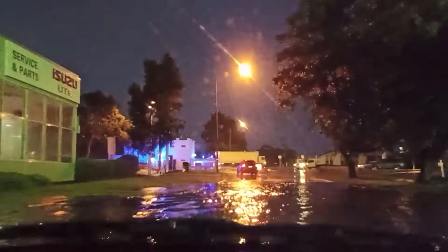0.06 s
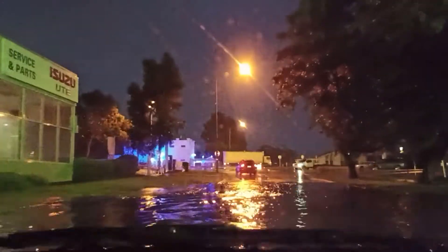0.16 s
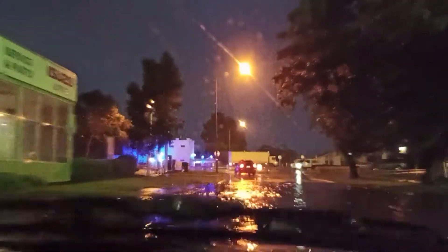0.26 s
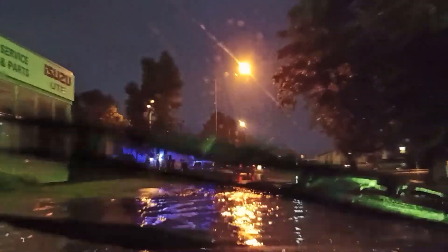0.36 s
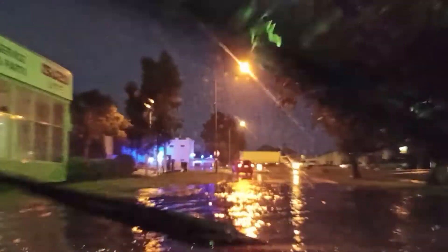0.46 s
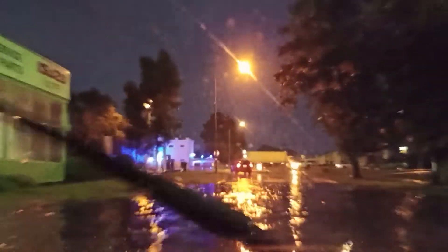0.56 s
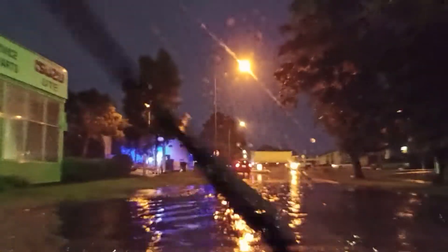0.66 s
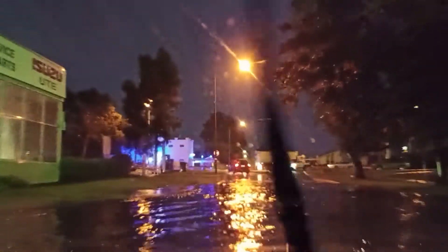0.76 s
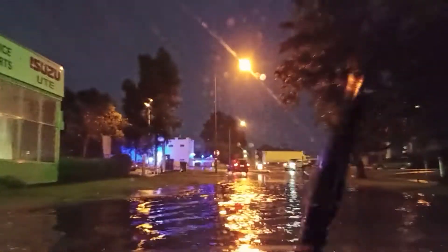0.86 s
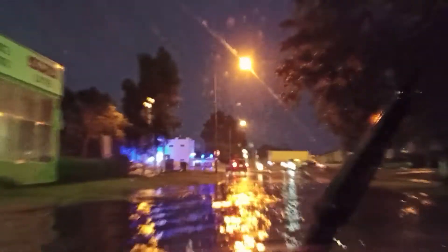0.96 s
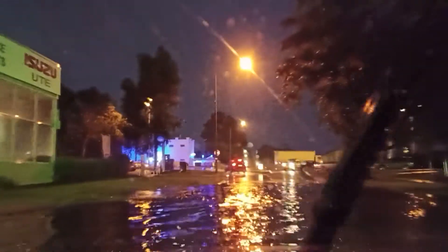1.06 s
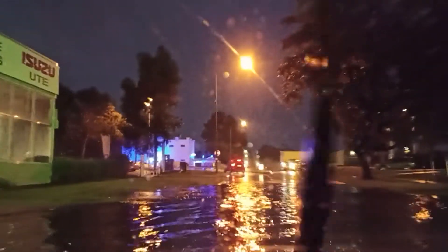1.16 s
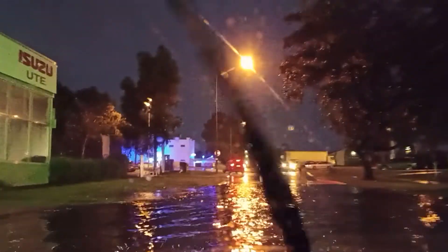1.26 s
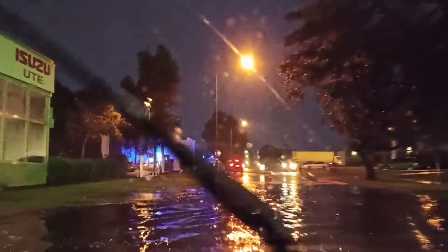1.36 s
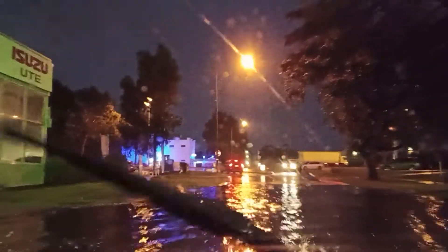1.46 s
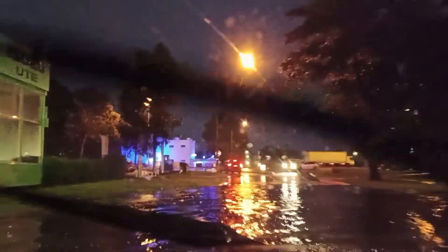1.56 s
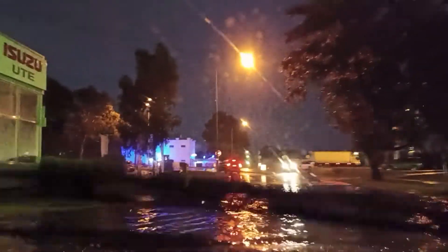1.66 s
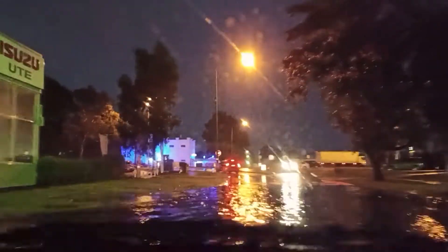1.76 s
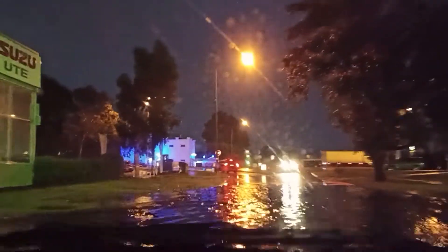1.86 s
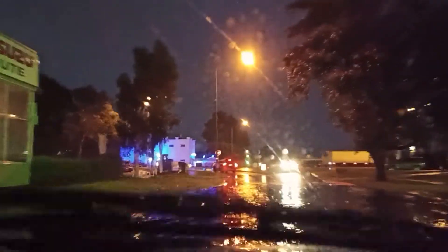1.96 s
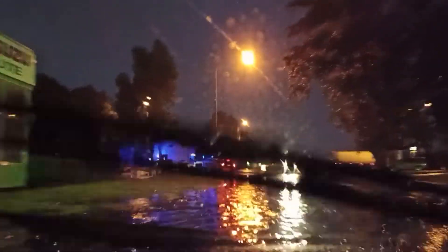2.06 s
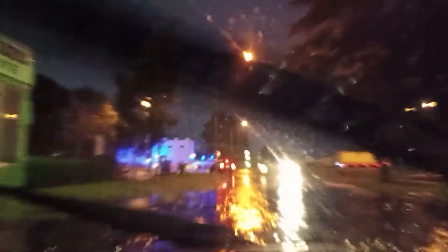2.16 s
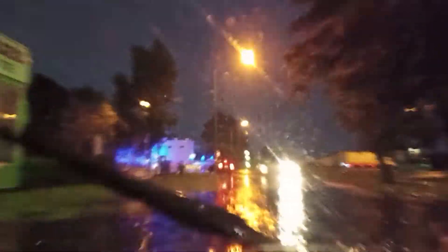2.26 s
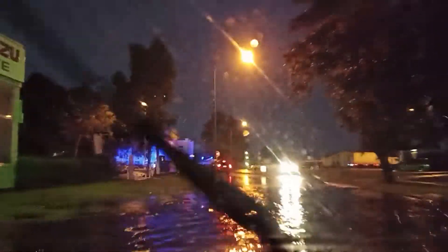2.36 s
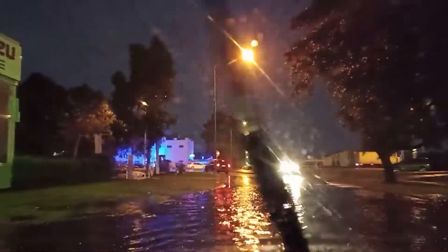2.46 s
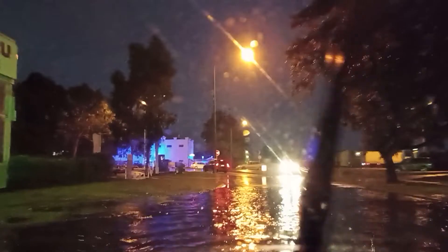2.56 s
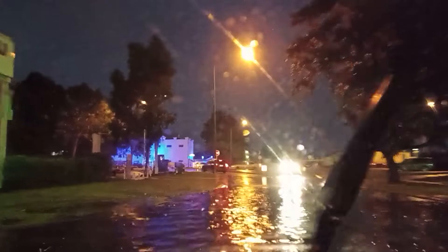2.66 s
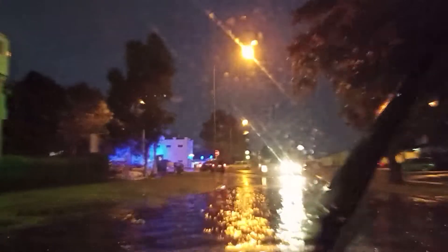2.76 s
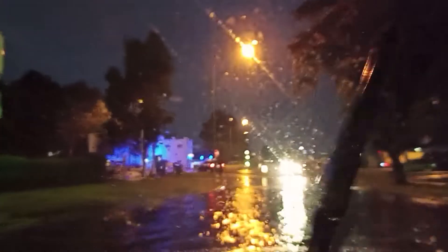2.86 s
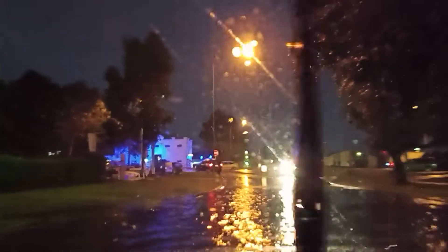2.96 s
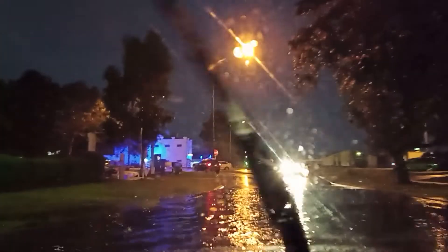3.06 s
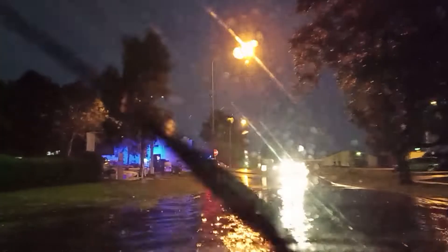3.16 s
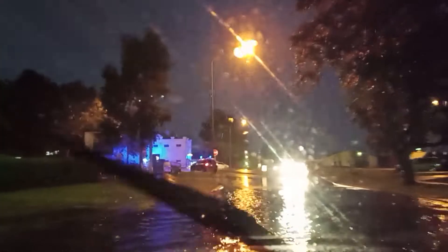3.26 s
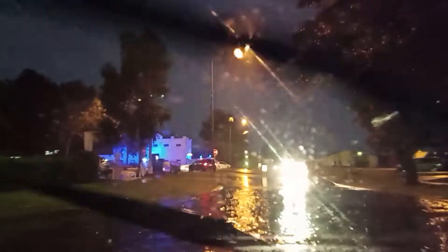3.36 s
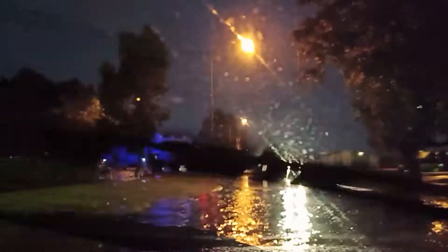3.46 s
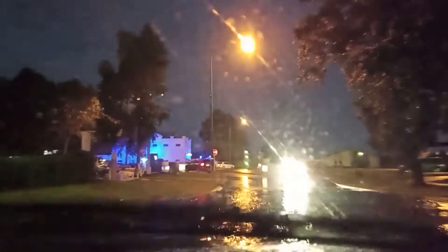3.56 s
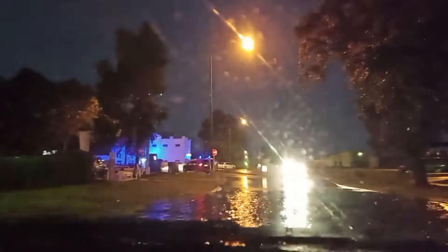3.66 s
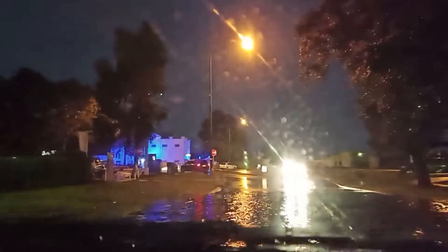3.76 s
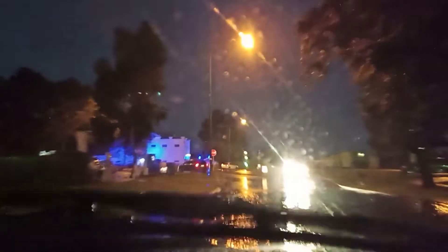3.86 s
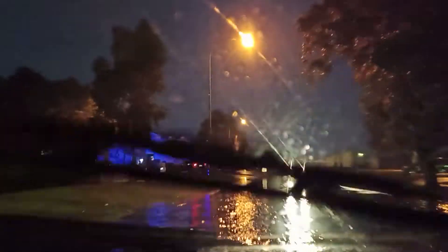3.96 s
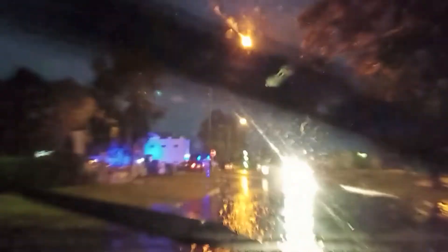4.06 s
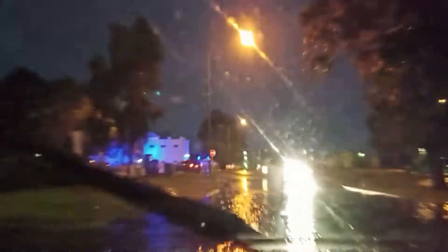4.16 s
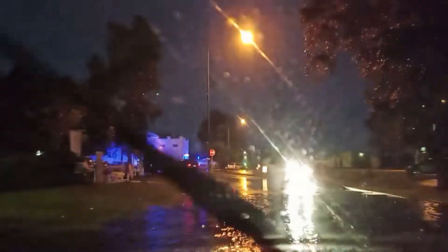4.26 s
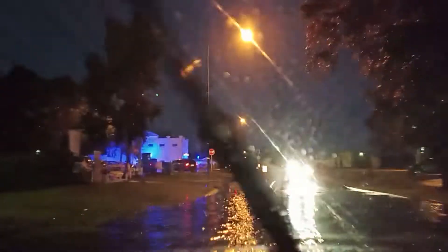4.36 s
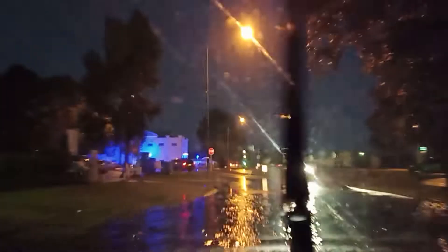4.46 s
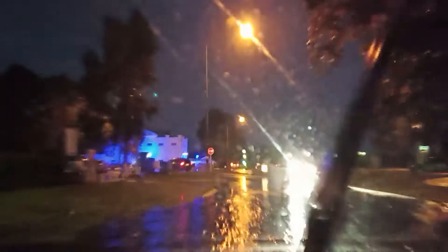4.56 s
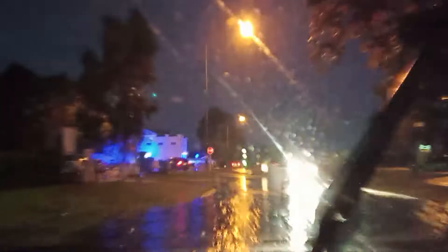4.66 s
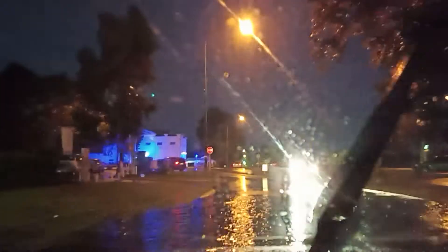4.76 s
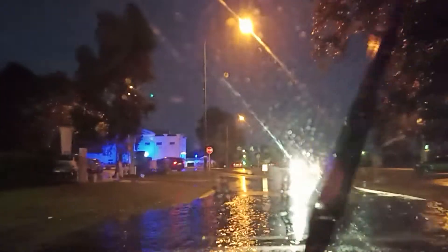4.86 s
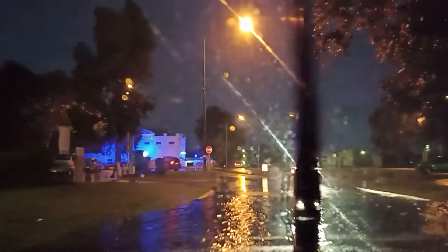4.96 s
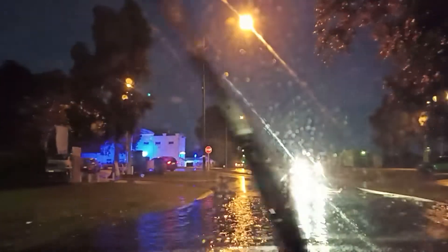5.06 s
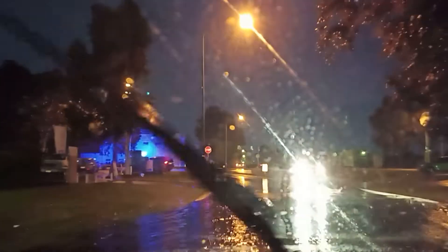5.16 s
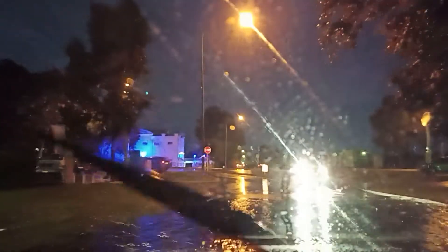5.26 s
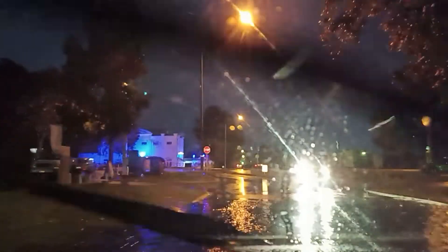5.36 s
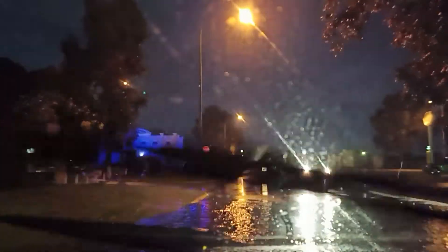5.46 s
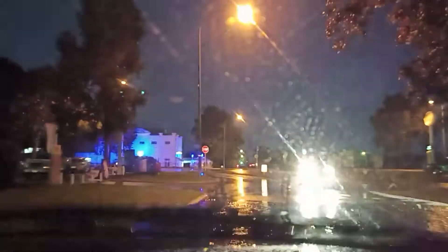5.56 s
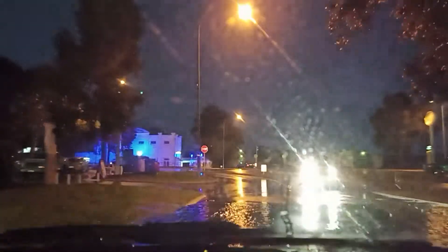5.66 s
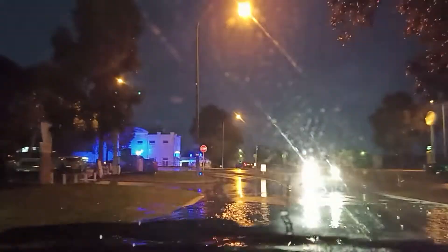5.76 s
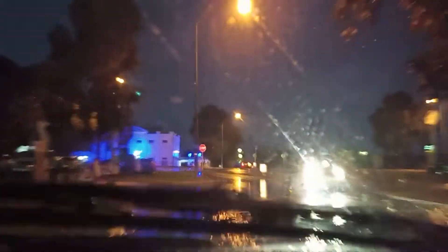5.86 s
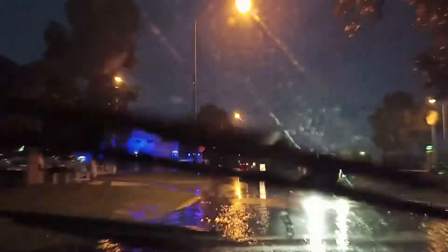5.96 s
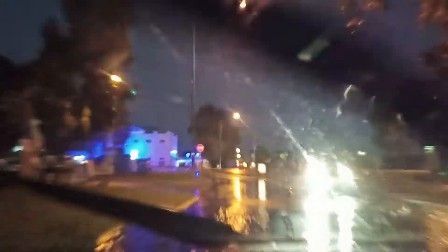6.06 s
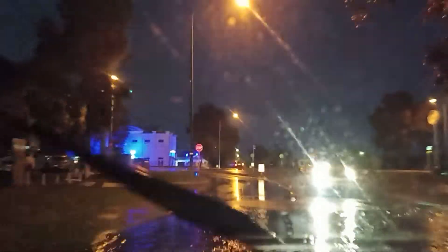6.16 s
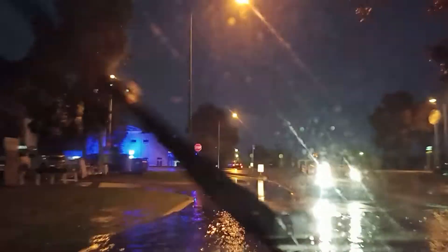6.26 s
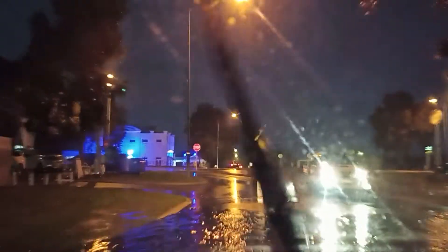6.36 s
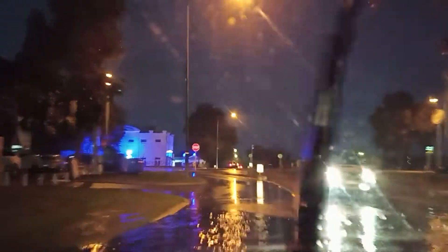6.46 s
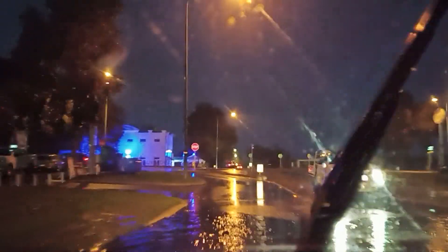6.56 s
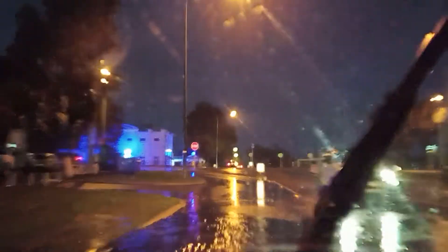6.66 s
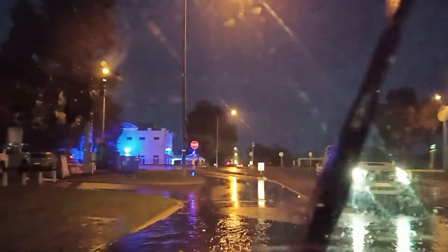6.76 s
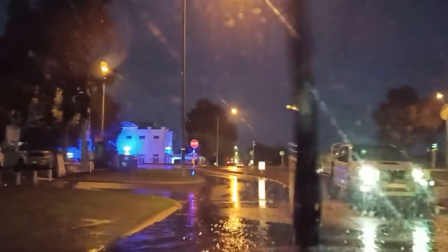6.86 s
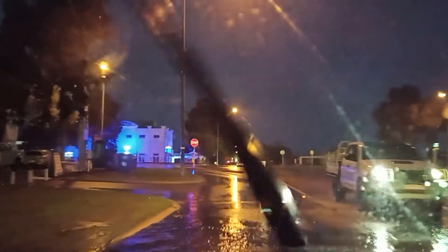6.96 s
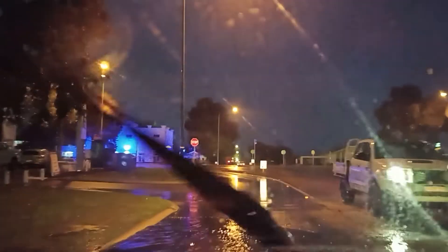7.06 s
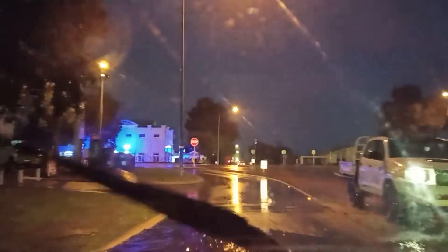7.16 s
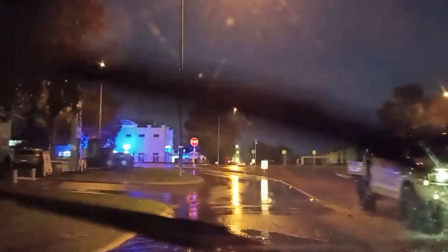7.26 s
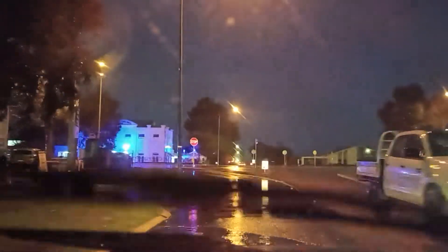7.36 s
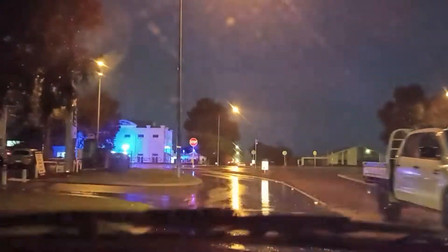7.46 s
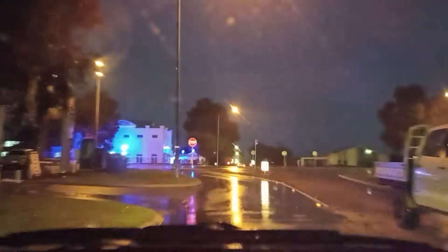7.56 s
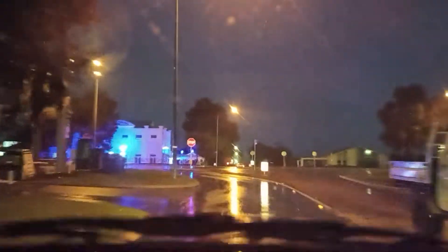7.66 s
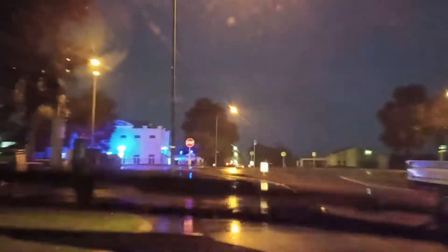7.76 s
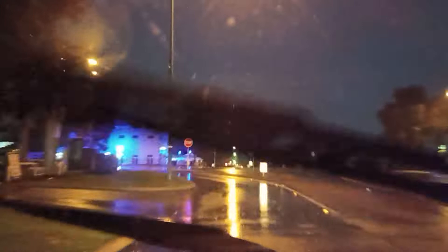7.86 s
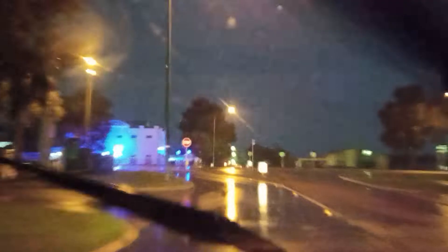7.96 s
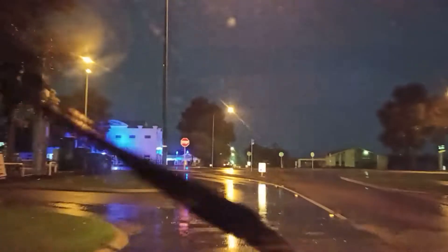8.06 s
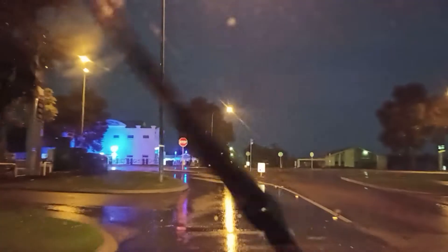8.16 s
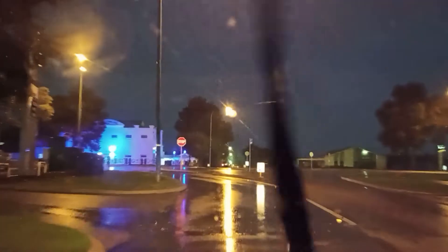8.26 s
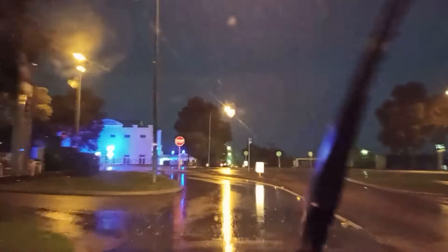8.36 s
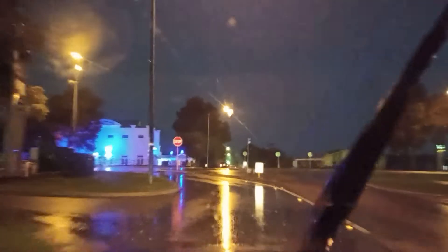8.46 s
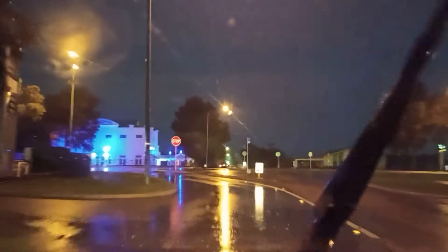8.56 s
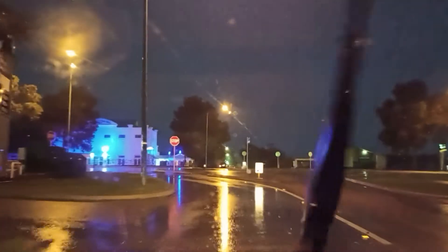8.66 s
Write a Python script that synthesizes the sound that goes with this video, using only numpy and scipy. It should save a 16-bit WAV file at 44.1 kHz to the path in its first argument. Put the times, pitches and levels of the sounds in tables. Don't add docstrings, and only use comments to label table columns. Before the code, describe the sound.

A microphone on the dashboard of a car wading slowly through floodwater in rain. Steady bass hum of engine and churning water drumming on the floor pan; thin spray hiss above. Fast wipers knock, click and judder in irregular clusters. A tinny, very rapid metallic rattle fills most of the first five seconds, pauses briefly after four, then stops. The driver lifts off near six seconds and rumble and wiper thuds remain.

```python
import sys
import numpy as np
from scipy import signal
from scipy.fft import rfft, irfft, next_fast_len
from scipy.io import wavfile
from scipy.ndimage import uniform_filter1d, map_coordinates

SR = 44100
rng = np.random.default_rng(int(sys.argv[2]) if len(sys.argv) > 2 else 0)


def attenuation_scalar(level_db):
    decades = np.asarray(level_db, float) / 20
    return 10 ** decades


def digitize_waveform(pressure):
    field = np.atleast_2d(pressure).T
    bounded = np.clip(field, -1, 1)
    quanta = np.round(bounded * 32767).astype(np.int16)
    wavfile.write(sys.argv[1], SR, quanta)


N = 383669

# time in seconds, firing rate in Hz, fundamental in dB, second order in dB.
FIRING = [(0.0, 61.1, -16.5, -38.5), (0.15, 61.1, -25, -44), (0.42, 60.22, -19.5, -33),
          (1.5, 59.78, -21, -30), (1.68, 60.27, -24.5, -32), (2.58, 60.07, -21.5, -40.5),
          (3.55, 61.54, -24.5, -42), (4.17, 59.14, -26, -30), (4.47, 59.6, -22, -47),
          (4.79, 61.35, -26, -35.5), (5.37, 61.1, -29.5, -46), (5.45, 61.07, -25.5, -29.5),
          (5.75, 61.64, -26.5, -36), (5.93, 66.3, -47, -41), (6.1, 69.6, -43, -25.5), (6.35, 69, -46, -54)]
# frequency in Hz, level in dB.
BOOM_COLOUR = [(15, -120), (28, -33), (42, 0), (60, 16), (75, 8.0), (95, -38), (160, -120)]
BOOM_DB, IDLE_DB = -39, -35
LIFT_OFF_S, ROLL_DB = 5.84, -18

# time in seconds, bow wave in dB.
BOW_WAVE = [(0.0, -32), (0.8, -28), (1.9, -29), (2.5, -28), (3.7, -30), (4.4, -27.5), (5.3, -28),
            (5.8, -27), (6.6, -26.5), (7.0, -28), (7.7, -30), (8.7, -31.5)]
# frequency in Hz, density in dB per Hz.
FLOOR_COLOUR = [(15, -46), (25, -23), (35, -18), (48, -4.5), (118, 2.5), (141, 2.5), (188, 2), (281, -8),
                (330, -6), (430, -42), (730, -120)]
# frequency in Hz, density in dB per Hz.
SLOSH_COLOUR = [(120, -20.5), (200, -3.5), (293, -7.5), (351, -4.5), (404, -10.5), (529, -11), (752, -21),
                (823, -24), (1020, -28), (2200, -43), (2860, -90), (4840, -120)]
# frequency in Hz, level in dB.
SCRAPE_COLOUR = [(500, -120), (900, -36), (1500, -4.5), (3000, 0.5), (9000, -12.5), (11000, -40), (15000, -120)]
SLOSH_DB, SLOSH_FOLLOWS = -33.5, 1
SCRAPE_DB = -54
SLIP_DB = -9

# peak in seconds, build-up in seconds, judder in dB, body surge in dB.
WIPER_STROKES = [(0.35, 0.32, -27, -28), (0.46, 0.046, -38, -26), (0.54, 0.027, -32, -20),
                 (1.02, 0.032, -30.5, -22.5), (2.03, 0.063, -23, -20), (2.18, 0.075, -26.5, -20),
                 (2.28, 0.067, -31.5, -19.5), (2.78, 0.05, -29, -22), (3.97, 0.18, -26, -25),
                 (4.13, 0.07, -39, -19), (4.21, 0.037, -30, -19), (4.63, 0.028, -38, -23.5),
                 (4.75, 0.045, -28, -24), (5.47, 0.057, -40, -29), (5.9, 0.068, -24.5, -36),
                 (6.0, 0.17, -38, -21.5), (6.23, 0.13, -32.5, -24.5), (6.73, 0.056, -29.5, -20),
                 (7.78, 0.098, -23.5, -30), (8.0, 0.037, -35, -23), (8.46, 0.027, -43, -28),
                 (8.55, 0.042, -29.5, -29)]
BUILD_DB, JUDDER_FALL_S, SURGE_FALL_S = 16, 0.089, 0.094

# time in seconds, hiss in dB.
RAIN_HISS = [
    (0.0, -63.5),
    (0.37, -76),
    (0.45, -64),
    (4.1, -60),
    (4.3, -64),
    (5.25, -60.5),
    (5.9, -62),
    (6.8, -60.5),
    (8.7, -59),
]
# frequency in Hz, density in dB per Hz.
SPRAY_COLOUR = [(710, -3), (1200, -3), (1640, -2), (1770, -1), (2440, -5.5), (3130, -3), (4190, -1.5),
                (6110, -7), (6590, -11.5), (8270, -8.5), (10800, -29), (14800, -20.5), (15800, -26)]
# frequency in Hz, level in dB.
HIGH_HISS_COLOUR = [(7000, -120), (10000, 2), (15700, -3)]
# time in seconds, level in dB.
FIZZ = [(8.497, -110), (8.5, -63), (8.518, -65), (8.522, -58), (8.53, -110)]
# frequency in Hz, level in dB.
FIZZ_COLOUR = [(9000, -60), (13800, -14), (14800, 0), (15600, 0), (16000, -120)]

# time in seconds, peak in dB, pitch in Hz.
RUBBER_SLIPS = [(0.196, -27, 250), (0.28, -21, 350), (0.292, -14, 355), (0.303, -21, 345),
                (0.316, -24, 250), (0.334, -14, 482), (0.343, -27, 619), (0.35, -12.5, 250),
                (0.363, -19, 334), (0.372, -26, 301), (0.435, -30, 252), (0.451, -12, 253),
                (0.451, -21, 315), (1.988, -15, 310), (2.01, -11, 295), (2.022, -15, 306),
                (2.032, -21, 250), (2.043, -27, 501), (2.064, -26, 275), (2.172, -21, 358),
                (2.245, -21, 336), (2.26, -16, 250), (3.864, -18, 251), (3.893, -9, 250), (3.903, -20, 380),
                (3.933, -14, 250), (3.948, -11, 247), (3.962, -17, 250), (3.994, -15, 361),
                (4.048, -12, 354), (4.118, -17, 383), (4.127, -22, 250), (4.202, -28, 388),
                (4.209, -20, 336), (4.219, -25, 383), (4.623, -13, 345), (5.25, -28, 247.4),
                (5.726, -26, 256), (5.852, -21, 367), (5.873, -9, 350), (5.897, -28, 314), (5.91, -16, 350),
                (5.931, -17.5, 480), (5.959, -14, 269), (6.097, -15, 273), (6.113, -18, 358),
                (6.213, -15, 253), (7.732, -13, 258), (7.776, -17, 325), (7.787, -10, 384),
                (7.808, -14, 342), (7.838, -17, 339), (7.879, -15.5, 366), (7.895, -16, 338),
                (8.443, -15.5, 332), (8.458, -21, 336), (8.516, -24, 250), (8.585, -21.5, 517)]
# frequency in Hz, level in dB.
RASP_COLOUR = [(300, -120), (600, 3), (1000, -0.5), (1800, -10), (2600, -20), (5000, -120)]

# time in seconds, peak in dB, low part in dB.
LINKAGE_CLICKS = [(0.198, -50, -2), (0.3331, -28, -1), (0.3458, -33, -1), (0.434, -38, -4),
                  (0.445, -29, -4), (0.5351, -23, -8), (1.0114, -30, -4), (2.0119, -31.5, 7.5),
                  (2.0637, -33, 4), (2.1625, -23, -39), (2.2541, -16.5, -10.5), (4.127, -23.5, -6),
                  (4.238, -31, -4), (4.5322, -22, -4.5), (5.251, -54, 2), (5.8557, -30, 2.5),
                  (5.8844, -43, -1), (5.9133, -38, 11), (6.0262, -25, -2.5), (6.103, -25, -5),
                  (6.2236, -19.5, -9), (7.7729, -52, 17), (7.7997, -41, -34), (7.8876, -29.5, -0.5),
                  (7.9814, -31, 2.5), (8.089, -48, 8), (8.2626, -35, 2), (8.4525, -26.5, -8),
                  (8.517, -38.5, 5)]
# frequency in Hz, level in dB.
CRACK_COLOUR = [(500, -120), (1200, -17), (2000, -1.5), (4000, -0.5), (8000, -8.5), (10000, -20.5),
                (15000, -31)]
# frequency in Hz, level in dB.
DULL_COLOUR = [(150, -120), (300, -20), (550, 8.0), (1500, -4.0), (2500, -24), (5000, -120)]

# time in seconds, peak in dB, pitch in Hz.
PANEL_KNOCKS = [(0.295, -23, 366), (0.336, -15, 110), (0.445, -7, 146), (0.534, -3.5, 188),
                (1.015, -7.5, 175), (2.011, -10.5, 298), (2.168, -4.5, 124), (2.255, -2, 146),
                (2.787, 0, 167), (3.96, -5.5, 204), (4.113, -7.5, 154), (4.249, -5.5, 156),
                (4.649, -7.5, 114), (4.739, -6.5, 167), (5.432, -16, 190), (5.859, -8.5, 176),
                (5.874, -8.5, 257), (6.026, -9, 199), (6.098, -11, 153.6), (6.441, -18, 177),
                (6.713, -0.5, 162.6), (7.774, -12, 121), (7.777, -6.5, 346), (7.889, -9.5, 94),
                (7.979, -7.5, 206), (8.263, -11, 193), (8.29, -12.5, 120), (8.531, -5.5, 156),
                (8.56, -16, 192), (8.587, -11, 140)]
# time in seconds, peak in dB, pitch in Hz.
TRIM_TAPS = [(0.335, -19, 530), (0.349, -15, 500), (0.435, -27, 479), (0.537, -15.5, 453),
             (1.351, -26, 514), (2.012, -26, 447.8), (2.257, -17, 463), (2.792, -17, 510),
             (3.137, -37, 565.7), (3.947, -14.5, 494), (4.536, -34, 533.8), (4.734, -22, 525),
             (5.481, -21, 470), (5.728, -24, 528), (6.03, -21, 487), (6.223, -23, 543.8),
             (7.775, -12.5, 511)]

# start in seconds, shakes per second.
DASHBOARD_SHAKE = [
    (0.45, 39.21),
    (1.09, 38.63),
    (2.07, 38.33),
    (3.75, 37.46),
    (4.03, 36.37),
    (4.5, 36.9),
    (4.8, 36.09),
]
# start in seconds, end in seconds, force at first in dB, force at last in dB.
CONTACT_BOUTS = [(.49, .515, -10, -10), (.515, .617, -4.5, -5.5), (0.638, 0.697, -1, -7.5),
                 (.72, .747, -14, -18), (.747, .798, -4, -13), (.824, .85, -5, -5), (.85, .93, -13, -6),
                 (.93, 1.001, -3.5, 0), (1.0, 2.55, -0.5, -0.5), (2.55, 2.67, -4, -1), (2.67, 4.05, -1, -1),
                 (4.048, 4.077, -13, -18), (4.436, 4.461, -8, -6.5), (4.49, 4.68, -7, -4),
                 (4.68, 4.83, -4, -0.5), (4.83, 5.18, -2, -5), (5.18, 5.21, -12, -12)]
LANDING_MOMENTS = [.05, .16, .31, .5]
# frequency in Hz, then level in dB under each of the four landings.
MODES = [(1430, -17, -31, -15, -11), (2810, -18, -12, -8, -20), (2960, -17, -8, -6, -9),
         (3110, -30, -11, -14, -10), (3745, -20, -12, -16, -12), (3860, -14, -4, -15, -4),
         (4900, -9, 0, -17, -10), (5060, -4, -1, -20, -10), (5235, -14, -9, -16, -18),
         (5420, -16, -11, -10, -12), (5650, -18, -11, -19, -14), (5980, -11, -13, -17, -13),
         (6690, -14, -8, -11, -16), (6940, -16, -4, -8, -24), (7150, -17, -6, -9, -26),
         (7820, -21, -17, -13, -14), (8110, -9, -4, 0, 2), (8760, -12, -10, -16, -23),
         (9220, -14, -11, -11, -23), (9500, -14, -13, -12, -16), (10100, -16, -13, -18, -29),
         (11100, -19, -21, -36, -26), (12900, -13, -35, -25, -32), (13600, -18, -15, -29, -26),
         (14600, -26, -8, -9, -14), (14900, -26, -9, -11, -17)]
# frequency in Hz, density in dB per Hz.
CHATTER_COLOUR = [(1290, -43), (2200, -8), (2890, -7), (4320, -8), (4920, -1), (6200, -11), (7490, -10.5),
                  (8130, -8), (10600, -18), (12400, -20), (14900, -12), (15700, -19)]
HABIT = .88
CLATTER_GROWS, TOP_GROWS = 1.3, 4.5
UNSURE = .1
LEAD, SPAN = 200, 3000


def unit(x):
    return x / np.sqrt(np.mean(x ** 2) + 1e-20)


def curves(rows):
    s, *cols = np.transpose(rows)
    return [np.interp(np.arange(N) / SR, s, c) for c in cols]


def wobble(rate):
    knots = rng.standard_normal(int(N * rate / SR) + 4)
    return map_coordinates(knots, [np.arange(N) * rate / SR])


def filtered(x, response):
    m = next_fast_len(N + SR // 2)
    return irfft(rfft(x, m) * response(np.fft.rfftfreq(m, 1 / SR)), m)[:N]


def coloured(x, points):
    f, db = np.transpose(points)
    return filtered(x, lambda hz: attenuation_scalar(np.interp(np.log(hz + 1), np.log(f), db)))


def patchy(patchy_db):
    z = signal.stft(rng.standard_normal(N + 512), nperseg=512)[2]
    field = uniform_filter1d(rng.standard_normal(z.shape), 6, 0)
    field = uniform_filter1d(field, 8, 1)
    return signal.istft(z * attenuation_scalar(patchy_db * unit(field)), nperseg=512)[1][:N]


def spikes(rate, spread_db):
    hit = rng.random(N) < rate / SR
    size = attenuation_scalar(spread_db * np.minimum(rng.exponential(size=N), 3))
    return unit(hit * size * rng.choice([-1, 1], N))


def struck(rows, shape):
    out = np.zeros(N + SR)
    t = np.arange(SR // 5) / SR
    for s, db, column in rows:
        out[round(s * SR):][:len(t)] += attenuation_scalar(db) * shape(t, column)
    return out[:N]


def blow(t, hz, t60, rise_s):
    return attenuation_scalar(-60 * t / t60) * (1 - np.exp(-t / rise_s)) * np.sin(2 * np.pi * hz * t)


def engine():
    hz, first_db, second_db = curves(FIRING + [(6.6, 62.7, -40.5, -73)])
    turn = 2 * np.pi * np.cumsum(hz) / SR + 0.75 * wobble(6.5)
    first = attenuation_scalar(first_db + 2.0 + 0.16 * wobble(4.2)) * np.sin(turn)
    second = attenuation_scalar(second_db + 4.5 + 1.86 * wobble(13)) * np.sin(2 * turn + 2.0 * wobble(11))
    return first + second


def swells(levels_db, fall_s):
    s, rise_s = np.transpose(WIPER_STROKES)[:2]
    late = np.arange(0, N + 64, 64) / SR - s[:, None]
    loss_db = BUILD_DB * np.where(late < 0, -late / rise_s[:, None], late / fall_s)
    size = np.sqrt(np.sum(attenuation_scalar(levels_db[:, None] - loss_db) ** 2, axis=0))
    return np.interp(np.arange(N), np.arange(len(size)) * 64, size)


def water():
    (wave_db,) = curves(BOW_WAVE)
    judder_db, surge_db = np.transpose(WIPER_STROKES)[2:]
    surge = swells(surge_db, SURGE_FALL_S)
    judder = swells(judder_db, JUDDER_FALL_S)

    rumble = unit(coloured(patchy(patchy_db=0.0), FLOOR_COLOUR))
    drumming = np.hypot(attenuation_scalar(wave_db - 0.5 + 0.76 * wobble(9)), attenuation_scalar(-1.0) * surge)

    load = np.clip((LIFT_OFF_S - np.arange(N) / SR) / .3 + .5, 0, 1)
    idle = np.hypot(attenuation_scalar(IDLE_DB + 1.4 * wobble(4.2)), attenuation_scalar(ROLL_DB) * surge)
    roll = load * attenuation_scalar(BOOM_DB) + (1 - load) * idle
    boom = unit(coloured(rng.standard_normal(N), BOOM_COLOUR))

    slosh = np.hypot(attenuation_scalar(SLOSH_DB + SLOSH_FOLLOWS * (wave_db + 28.5)), judder)
    slaps = attenuation_scalar(1.48 * wobble(45)) * patchy(patchy_db=0.5) + .4 * spikes(300, spread_db=4.5)
    scrape = unit(coloured(slaps, SCRAPE_COLOUR))
    bright = attenuation_scalar(SCRAPE_DB) * (slosh / attenuation_scalar(-30)) ** 1.3
    t = np.arange(SR // 50) / SR
    slip_burst = attenuation_scalar(-60 * t / .018) * rng.standard_normal(len(t))
    small_slips = np.convolve(spikes(110, spread_db=3), slip_burst)[:N]
    wash = slosh * unit(coloured(slaps, SLOSH_COLOUR)) + bright * scrape
    wash = wash + attenuation_scalar(SLIP_DB) * judder * unit(coloured(small_slips, SLOSH_COLOUR))
    return drumming * rumble + roll * boom + wash


def rain():
    (hiss_db,) = curves(RAIN_HISS)
    (fizz_db,) = curves(FIZZ)
    drops = patchy(patchy_db=1.54) + .35 * spikes(250, spread_db=4.0)
    spray = attenuation_scalar(hiss_db + 11.0 + 0.15 * wobble(22.0)) * unit(coloured(drops, SPRAY_COLOUR))
    high_hiss = attenuation_scalar(-72.5) * unit(coloured(rng.standard_normal(N), HIGH_HISS_COLOUR))
    fizz = attenuation_scalar(fizz_db) * unit(coloured(rng.standard_normal(N), FIZZ_COLOUR))
    return spray + fizz + high_hiss


def slips():
    pluck = struck(RUBBER_SLIPS, lambda t, hz: blow(t, hz, t60=0.039, rise_s=0.0011))
    rasp = struck(RUBBER_SLIPS, lambda t, hz: attenuation_scalar(-60 * t / 0.04) * rng.standard_normal(len(t)))
    return attenuation_scalar(-1.5) * pluck + attenuation_scalar(-9) * coloured(rasp, RASP_COLOUR)


def clicks():
    fade = lambda t: attenuation_scalar(-60 * t / 0.046) + 0.24 * attenuation_scalar(-60 * t / 0.048)
    crack = struck(LINKAGE_CLICKS, lambda t, low_db: fade(t) * rng.standard_normal(len(t)))
    dull = struck(LINKAGE_CLICKS, lambda t, low_db: attenuation_scalar(low_db - 60 * t / 0.065) * rng.standard_normal(len(t)))
    return attenuation_scalar(-4.5) * coloured(crack, CRACK_COLOUR) + attenuation_scalar(7.5) * coloured(dull, DULL_COLOUR)


def knocks():
    panel = struck(PANEL_KNOCKS, lambda t, hz: blow(t, hz, t60=0.066, rise_s=0.0032))
    trim = struck(TRIM_TAPS, lambda t, hz: blow(t, hz, t60=.028, rise_s=.0008))
    return attenuation_scalar(-1.76) * panel + attenuation_scalar(-1.5) * trim


def contact(s):
    force_db = np.full(len(s), -40.)
    for first_s, last_s, first_db, last_db in CONTACT_BOUTS:
        inside = (s >= first_s) & (s < last_s)
        force_db[inside] = np.interp(s[inside], [first_s, last_s], [first_db, last_db])
    scatter = 1 + UNSURE * rng.standard_normal((len(s), 3))
    return (force_db[:, None] * [1, CLATTER_GROWS, TOP_GROWS] * scatter).T


def mode_levels(s, hz, rings):
    ring_db, clatter_db, top_db = contact(s)
    lower_db = np.outer(ring_db, rings) + np.outer(clatter_db, 1 - rings)
    level_db = np.where(hz > 14000, top_db[:, None], lower_db)
    level_db[:, (hz < 3600) | (abs(hz - 5000) < 150)] += .22 * top_db[:, None]
    level_db[:, (hz > 8500) & (hz < 14000)] += .2 * top_db[:, None]
    return attenuation_scalar(level_db) * (clatter_db + ring_db > -46)[:, None]


def trinket():
    from_s, rate = np.transpose(DASHBOARD_SHAKE)
    now = np.arange(N)
    shakes_per_s = np.r_[0, rate][np.searchsorted(from_s * SR, now)]
    cycle = np.cumsum(shakes_per_s) / SR + .45
    last = int(cycle[int(CONTACT_BOUTS[-1][1] * SR)])
    starts = np.searchsorted(cycle, np.arange(1, last + 1))

    hz, *strike_db = np.transpose(MODES)
    rings = (abs(hz - 8000) < 200) + .95 * (abs(hz - 3840) < 50)
    level = mode_levels(starts / SR + .019, hz, rings)
    phase = rng.uniform(0, 2 * np.pi, level.shape)
    loose = np.where(rings == 1, .2, np.where(rings > 0, .7, .25))

    t = np.arange(-LEAD, SPAN - LEAD) / SR
    soft = np.exp(-.5 * (np.arange(-150, 151) / SR / .0008) ** 2)
    soft = soft / soft.sum()
    bursts, skids = 0, 0
    for at, db in zip(LANDING_MOMENTS, strike_db):
        late = t - at / 38.4

        def eased(t60):
            return np.convolve((late > 0) * attenuation_scalar(-60 * late / t60), soft, "same")

        fade = 1.15 * eased(.028) + .16 * eased(.11)
        tail = .3 * eased(.11)
        high_fade = 1.4 * eased(.025) + .13 * eased(.08)
        shape = np.where(hz[:, None] > 8500, high_fade, fade)
        size = level * attenuation_scalar(db + 0.4 * rng.standard_normal(level.shape))
        turn = phase + loose * rng.standard_normal(level.shape)
        near_hz = hz + 16 * (rings < 1) * rng.standard_normal(len(hz))
        wave = 2 * np.pi * np.outer(near_hz, t)
        bursts = bursts + size * np.cos(turn) @ (shape * np.sin(wave))
        bursts = bursts + size * np.sin(turn) @ (shape * np.cos(wave))
        skids = skids + (fade + tail) * attenuation_scalar(np.mean(db[hz > 8500]))

    where = (starts[:, None] + np.arange(-LEAD, SPAN - LEAD)).ravel()
    lay = lambda rows: np.bincount(where, rows.ravel(), N)[:N]

    latest = starts[np.searchsorted(starts, now, "right") - 1].clip(now - 2799, now)
    habit = rng.standard_normal(2800)[now - latest]
    mixed = HABIT * habit + np.sqrt(1 - HABIT ** 2) * rng.standard_normal(N)
    grit = coloured(mixed + .5 * spikes(1600, spread_db=-3.5), CHATTER_COLOUR)
    top = filtered(grit, lambda f: abs(f - 14700) < 450)
    chatter = lay(level[:, :1] * skids) * (grit - top) + lay(level[:, -1:] * skids) * top
    return attenuation_scalar(-43.5) * lay(bursts) + attenuation_scalar(-25) * chatter


def scene():
    return (engine() + water() + rain() + slips() + clicks() + knocks() + trinket())[None]


def top_cut(x):
    return signal.sosfilt(signal.butter(12, 16080, fs=SR, output="sos"), x)


def record(dry):
    def response(hz):
        limit = attenuation_scalar(-30 * np.clip((hz - 15450) / 350, 0, 4) ** 2)
        return limit * (1 - 0.41 * np.exp(-((hz - 2150) / 130) ** 2))

    mix = filtered(dry[0], response)[None]
    return top_cut(mix)


dry = scene()
out = record(dry)
digitize_waveform(out)
```